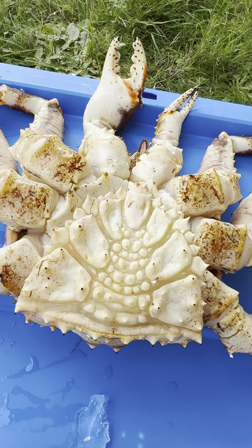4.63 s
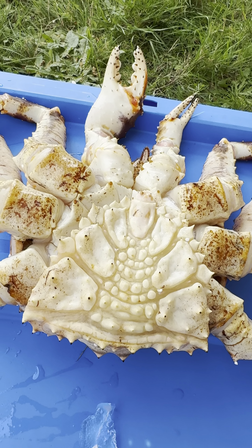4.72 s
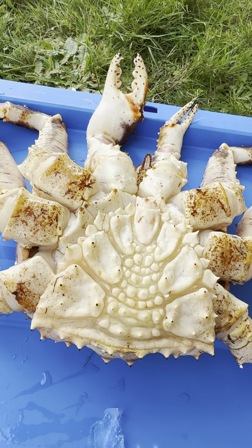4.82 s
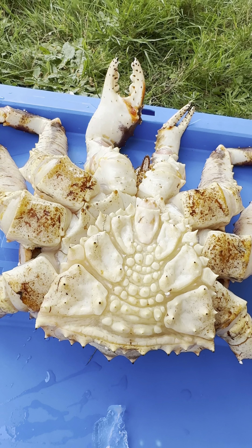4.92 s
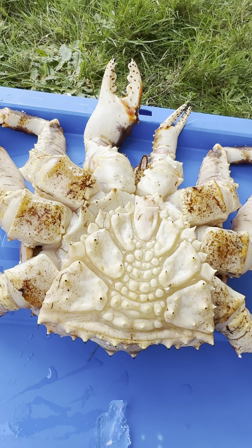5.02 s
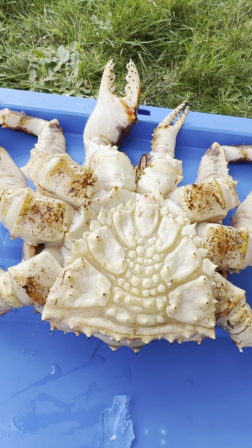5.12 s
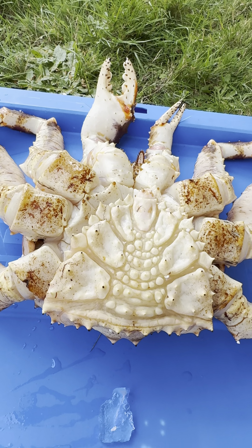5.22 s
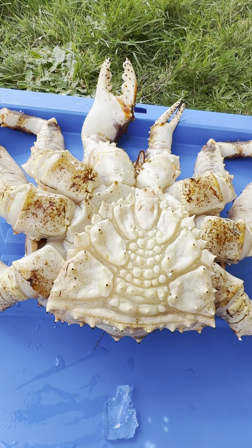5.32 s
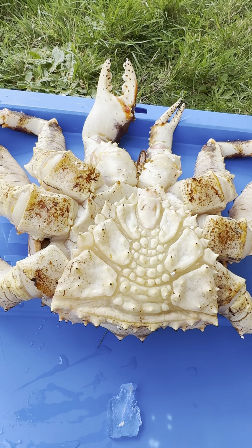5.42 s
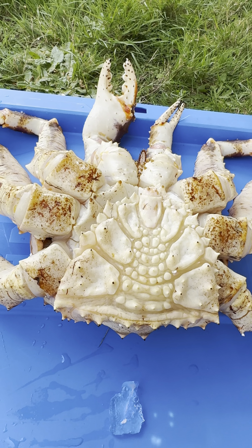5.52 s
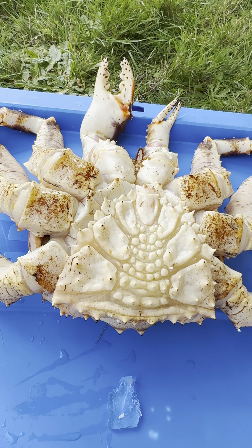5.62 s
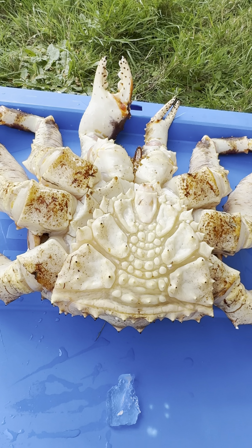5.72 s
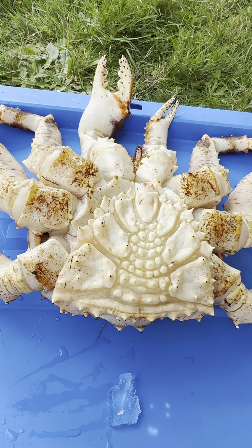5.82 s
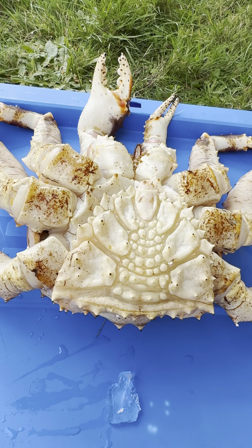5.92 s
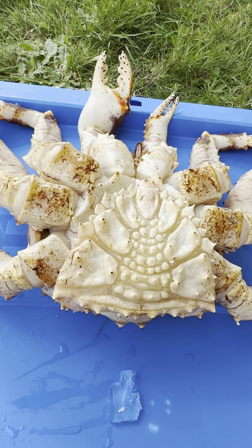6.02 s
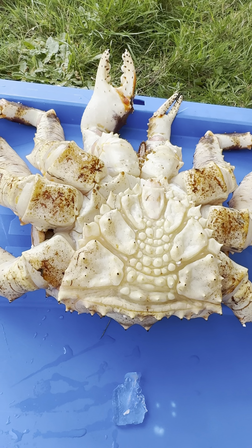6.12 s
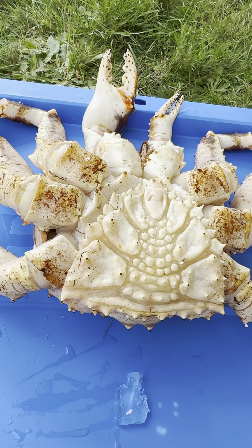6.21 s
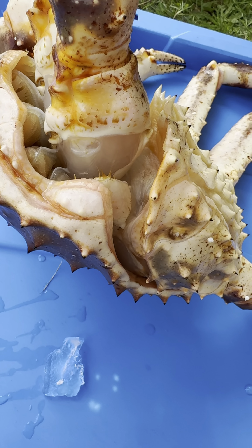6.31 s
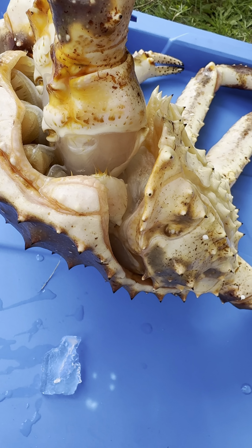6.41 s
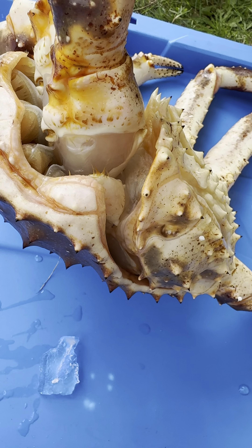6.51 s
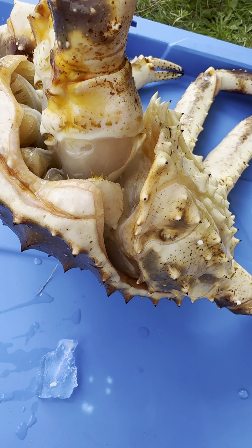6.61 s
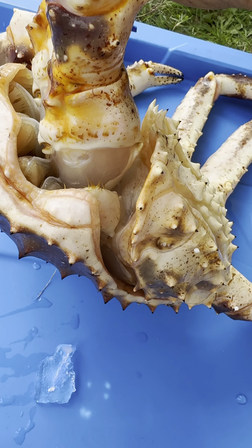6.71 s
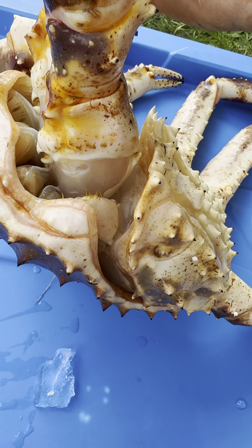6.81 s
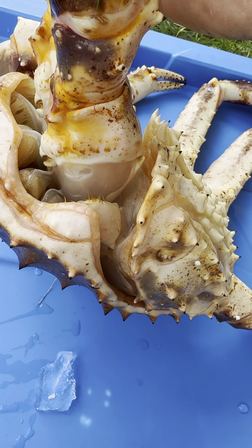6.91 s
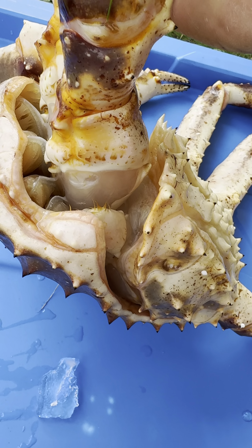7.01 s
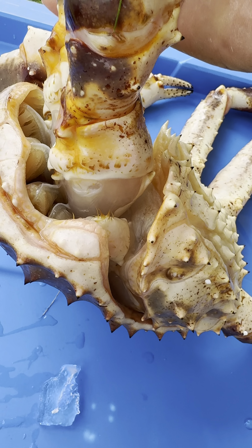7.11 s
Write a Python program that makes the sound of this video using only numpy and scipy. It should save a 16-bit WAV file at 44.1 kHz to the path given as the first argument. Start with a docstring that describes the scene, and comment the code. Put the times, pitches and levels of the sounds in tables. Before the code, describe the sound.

Close stereo sound of a heavy crab shifted in a plastic tub in a yard, over low, slightly wavering motor hum, rumble and faint outdoor hiss. Right at the start a loud, hard, hollow knock lands, followed at 0.3 s by another bright crack; each dies almost instantly, with a short echo from a nearby wall. Hands rustle very softly. From 0.9 to 1.2 s several medium bumps cluster around a brief gritty scrape. At 1.75 to 2 s legs slide and rasp on the side wall with a clear woody tap and weaker ones. Then it is quiet, with tiny ticks and barely audible distant chirps near 2.4 and 3 s. Faint bumps come at 4.1 s, then a tight cluster of moderate knocks at 4.6 to 4.7 s. Small dry clicks occur near 5.4 s. From 6.2 s a deeper hum joins and grows to the end, around 7.2 s, with minute ticks and faint chirps.

```python
"""A large crab is shifted about in a plastic tub: its shell knocks on the floor, its legs on the side wall.
Each blow drives a bank of decaying plastic modes. Filtered noise and trains of tiny blows make the ticks,
drags, slides, judders and the rustle of hands. A nearby wall in the yard answers with an echo and a tail.
Behind it machinery hums on unsteady tones over a rumble, under a faint outdoor hiss with far chirps."""
import sys
import numpy as np
from scipy import signal
from scipy.fft import rfft, irfft, next_fast_len
from scipy.io import wavfile
from scipy.ndimage import uniform_filter1d, minimum_filter1d, map_coordinates

SR = 44100
rng = np.random.default_rng(int(sys.argv[2]) if len(sys.argv) > 2 else 0)


def digitize_waveform(pressure):
    """Quantize a signal to 16-bit integers and store it at the path in sys.argv[1].

    Rows of a 2-D input are taken as channels; values are limited to [-1, 1].
    """
    field = np.atleast_2d(pressure).T
    bounded = np.clip(field, -1, 1)
    quanta = np.round(bounded * 32767).astype(np.int16)
    wavfile.write(sys.argv[1], SR, quanta)


N = 315756  # samples

# Shell on the tub's floor. Each row: start in seconds, blow level in dB, contact cut-off in Hz (higher is
# harder), level of the weight behind it in dB, relative shell crack level in dB, pitch in Hz of the modes
# with a node where it lands, ring time as a multiple of the modes' own.
KNOCKS = [(0.024, -18.5, 690, -16, -83, 444, 1.5), (0.0476, 0.5, 2270, 0.5, -37.5, 1313, 1),
          (0.0625, -36, 2200, -16, -58, 307, 2.5), (0.2989, -3, 3200, -30, -35, 545, 1.1),
          (0.899, -29, 1900, -16, -49, 1250, 3), (0.9120, -18.5, 2100, 5, -37, 732, .8),
          (0.921, -22, 2030, -3.5, -57, 475, .5), (1.0099, -18.5, 1800, -7, -39, 594, 1.2),
          (1.029, -13.5, 2260, -4, -38.5, 860, 1), (1.041, -44, 2600, -6, -54, 550, 1.2),
          (1.1116, -19.5, 2300, -36, -50.5, 900, 1), (1.1533, -25.5, 1440, -14, -63, 950, 1.2),
          (1.176, -35, 780, -12.5, -76, 430, .9), (4.0967, -37, 2010, -9.5, -49, 510, 1.7),
          (4.1185, -28.5, 990, -26, -68, 564, 3), (4.612, -30, 1550, -16, -61, 910, 1.2),
          (4.6517, -32, 1900, -11, -53, 480, 1.2), (4.6575, -16, 2670, -4, -48.5, 1500, .75),
          (4.673, -18.5, 1430, -10, -57.5, 920, .8), (4.6853, -37, 890, -20, -65, 700, 1.8),
          (4.708, -42, 1400, -28, -67, 503, 1.2)]
# Floor modes. Each row: pitch in Hz, level in dB, t60 in seconds, motion towards (+1) or away from (-1)
# the microphone.
FLOOR_MODES = [(83.8, -17, 0.14, 1), (184.6, -26.5, 0.17, -1), (234.3, -12.5, 0.054, 1),
               (290, -7.5, 0.02, -1), (370, -9.5, 0.038, 1), (548, -8.5, 0.024, -1), (650, -4.5, 0.036, 1),
               (709, -29, 0.096, 1), (897, -13, 0.033, 1), (1173, -1.1, 0.011, -1), (1383, -0.9, 0.012, 1),
               (1712, -13, 0.02, 1), (2063, -18, 0.03, -1), (2454, -3, 0.0061, -1), (2730, -9, 0.012, 1)]
# Crack of a hard contact. Each row: frequency in Hz, level in dB.
CRACK_SPECTRUM = [(500, -5.5), (2600, 3.5), (3600, 3), (8000, -7.5), (16000, -40)]
# Phase of the tub's sound at the two microphones. Each row: frequency in Hz, lead of the left in radians.
TUB_TWIST = [(150, 0), (400, -0.77), (800, -0.73), (1350, 0.87), (2700, 1)]
# How the tub radiates. Each row: frequency in Hz, level in dB added on the left and taken from the right.
TUB_LEAN = [(100, 0), (300, .8), (650, -.8), (1000, -3.4), (1350, -3.6), (1800, .4), (2500, 2.6)]
NODE_DEPTH, NODE_OCTAVES = 0.76, 0.3  # share of a mode lost when struck on its node, width in pitch
LEAD_S = .004  # room for the ring's first rise


def knocks():
    """Shell hits the floor: a short crack and a hollow ring, set by where it lands and how it damps."""
    out = np.zeros((2, N))
    t = np.arange(SR // 3) / SR
    crack_t = t[:SR // 20]
    hz = np.transpose(FLOOR_MODES)[0]
    for start_s, blow_db, contact_hz, weight_db, crack_db, node_hz, free in KNOCKS:
        octaves_off = np.log2(hz / node_hz)
        reach = 1 - NODE_DEPTH * np.exp(-(octaves_off / NODE_OCTAVES) ** 2)
        force = reach * contact(hz, blow_db, contact_hz, weight_db)
        ring = plastic_ring(FLOOR_MODES, force, size=len(t), detune=.008, free=free)
        crack_decay = amp(crack_db + 8.5 - 60 * crack_t / 0.018)
        crack = coloured(pair(0.13, size=len(crack_t)), CRACK_SPECTRUM) * crack_decay
        add(out, start_s - LEAD_S, placed(ring, TUB_TWIST, TUB_LEAN))
        add(out, start_s, crack)
    return out


# a blow rebounds too fast to drive the modes below BOUNCE_HZ; weight drives only those below WEIGHT_HZ
BOUNCE_HZ, WEIGHT_HZ = 260, 435


def contact(hz, blow_db, contact_hz, weight_db):
    """Force on each mode: a quick blow, brighter if harder, and the slow push of the crab's weight."""
    rebound = 1 + (BOUNCE_HZ / hz) ** 4
    softness = 1 + (hz / contact_hz) ** 6
    blow = amp(blow_db) / np.sqrt(rebound * softness)
    push = amp(weight_db) / np.sqrt(1 + (hz / WEIGHT_HZ) ** 6)
    return np.hypot(blow, push)


HEAVE_HZ = 150  # below this the floor moves as one piece
BEND_S, BEND_TOP_HZ = .001, 2940  # a quarter of the top frequency arrives about this much later


def plastic_ring(modes, force, size, detune, free=1):
    """One blow on plastic: damped modes; bending waves bring the high ones first, the low ones after."""
    f = np.fft.rfftfreq(size, 1 / SR)
    hz, db, t60_s, facing = np.transpose(modes)[:, :, None]
    # the crab's weight retunes the plastic a little
    pitch_hz = hz * (1 + detune * rng.standard_normal(hz.shape))
    # the shell damps the ripples in the plastic, but not the slow heave of the whole floor
    ring_s = np.where(hz > HEAVE_HZ, t60_s * free, t60_s)
    pole = 2j * np.pi * f + np.log(1000) / ring_s
    shapes = np.sign(facing) * amp(db) * SR * pole / (pole ** 2 + (2 * np.pi * pitch_hz) ** 2)
    delay_s = LEAD_S + BEND_S * (np.sqrt(BEND_TOP_HZ / (f + 50)) - 1)
    delayed = (force @ shapes) * np.exp(-2j * np.pi * f * delay_s)
    # soft plastic carries little above its highest mode
    return irfft(delayed / (1 + (f / 3500) ** 9), size)[None]


# Leg tips on the side wall. Each row: start in seconds, level in dB, contact cut-off in Hz.
TAPS = [(1.8016, -16, 1820), (1.9504, -25.5, 1260), (2.003, -35.5, 900), (4.616, -33, 1870),
        (4.735, -37, 900)]
# Side wall modes. Each row: pitch in Hz, level in dB, t60 in seconds, motion towards (+1) or away (-1).
WALL_MODES = [(330, -8, .02, 1), (715, 1.5, .016, 1), (1345, 4, .015, 1), (1970, 0, .014, 1),
              (2630, -4, .014, 1)]


def taps():
    """Leg tips strike the stiffer side wall with a light, woody tock; a lower cut-off is duller."""
    out = np.zeros((2, N))
    for start_s, db, tip_hz in TAPS:
        force = np.full(len(WALL_MODES), amp(db))
        ring = plastic_ring(WALL_MODES, force, size=SR // 10, detune=.012)
        tock = filtered(ring, lambda hz: 1 / (1 + (hz / tip_hz) ** 4))
        add(out, start_s - LEAD_S, tock)
    return out


# Spines and joints ticking. Each row: start in seconds, relative level in dB, pitch in Hz.
TICKS = [(0.561, -34, 2400), (1.524, -45, 8000), (1.554, -43, 8000), (1.624, -39.5, 7300),
         (2.606, -36.5, 3600), (4.109, -36.5, 7000), (5.371, -34, 6000), (5.383, -33, 8200),
         (5.39, -34.5, 6500), (6.469, -43, 8000), (6.843, -39.5, 9100), (6.901, -40, 8550),
         (7.068, -42.5, 8500)]


def ticks():
    """Spines and leg joints snap: tiny clicks of noise peaked at a pitch, falling 60 dB in 10 ms."""
    out = np.zeros((2, N))
    t = np.arange(SR // 25) / SR
    for start_s, db, hz in TICKS:
        spectrum = [(hz / 4, -22), (hz / 2, -7), (hz, 0), (hz * 2, -6)]  # (Hz, dB)
        snap = coloured(pair(-0.25, size=len(t)), spectrum)
        add(out, start_s - .0005, snap * amp(db - 5.0 - 60 * t / 0.01))
    return out


# Shell dragged over the floor. Each row: start in seconds, length in seconds, level in dB.
DRAGS = [(.13, 0.021, -46.5), (.967, 0.051, -24.5), (1.047, 0.011, -26), (1.706, 0.0082, -46),
         (4.48, 0.024, -50), (4.52, 0.033, -50), (4.611, 0.0071, -46.5), (4.872, 0.072, -57)]
# Colour of the drag's noise. Each row: frequency in Hz, level in dB.
DRAG_SPECTRUM = [(100, -24), (220, -3), (800, 1.5), (1400, -5.5), (2100, -6.5), (2900, -10.5),
                 (3500, -21.5), (7000, -24), (16000, -53)]
SWELL_DB = 8  # a drag grows by this much as the shell bites


def drags():
    """Gritty drags on the floor: catching spines over rough friction noise."""
    rough = friction(DRAG_SPECTRUM, rate_hz=450, rough_db=1.0, alike=0.34)
    grit = amp(CATCH_DB) * catches() + amp(1.5) * rough
    return strokes(DRAGS, attack_s=0.049, release_s=0.022, swell_db=SWELL_DB) * grit


CATCHES_PER_S, CATCH_RANGE_DB, CATCH_DB = 610, 1.5, -2.5  # rate, spread of sizes, level in the grit


def catches():
    """Spines catch and let go at random moments: each tiny blow rings the tub's floor."""
    hit = rng.random(N) < CATCHES_PER_S / SR
    sizes = rng.choice([-1, 1], N) * amp(CATCH_RANGE_DB * rng.standard_normal(N))
    force = contact(np.transpose(FLOOR_MODES)[0], 0, contact_hz=3000, weight_db=-2)
    ring = plastic_ring(FLOOR_MODES, force, size=SR // 5, detune=.008)
    rung = signal.fftconvolve((hit * sizes)[None], ring)[:, :N]
    return unit(placed(rung, TUB_TWIST, TUB_LEAN))


# Legs sliding and settling on the wall. Each row: start in seconds, length in seconds, level in dB.
SLIDES = [(0, 0.011, -34.5), (.062, .008, -32), (1.704, 0.017, -46), (1.75, 0.085, -33.5),
          (1.922, 0.019, -47.5), (4.124, 0.042, -41), (4.62, 0.0092, -38.5), (4.69, 0.013, -44.5)]
# Colour of the slides. Each row: frequency in Hz, level in dB.
SLIDE_SPECTRUM = [(120, -13), (280, 6.5), (400, 5), (500, 6), (620, 10), (760, 9), (1000, -11), (1270, -2),
                  (1470, -10.5), (1620, -9.5), (2000, -13.5), (3500, -21), (16000, -56)]


def slides():
    """Legs slide on the wall: duller friction noise."""
    rough = friction(SLIDE_SPECTRUM, rate_hz=430, rough_db=3.5, alike=0.44)
    return strokes(SLIDES, attack_s=0.12, release_s=0.087) * rough


# Leg tip juddering along the side wall. Each row: start in seconds, length in seconds, level in dB.
JUDDERS = [(1.752, 0.017, -35), (1.812, 0.025, -44), (1.932, .005, -46)]
SLIPS_PER_S, SLIP_SCATTER = 372, .07  # slip rate, log-normal unevenness of the gaps


def judders():
    """A leg tip sticks and slips in a quick, nearly even train that makes the side wall rasp."""
    gaps_s = np.exp(SLIP_SCATTER * rng.standard_normal(N // 50)) / SLIPS_PER_S
    moments = (np.cumsum(gaps_s) * SR).astype(int)
    sizes = amp(1.8 * rng.standard_normal(len(gaps_s)))
    slips = np.bincount(moments, sizes, minlength=N)[:N]
    ring = plastic_ring(WALL_MODES, np.ones(len(WALL_MODES)), size=SR // 10, detune=0, free=1.3)
    spectrum = [(350, -11), (740, 4), (1350, -8.5), (2600, -12.5)]  # (Hz, dB)
    rasp = coloured(signal.fftconvolve(slips[None], ring)[:, :N], spectrum)
    return strokes(JUDDERS, attack_s=0.043, release_s=0.056) * rasp


# Hands shifting their grip. Each row: start in seconds, length in seconds, level in dB.
RUSTLES = [(.05, 0.054, -70), (.57, 0.62, -58.5), (1.58, 0.23, -61.5), (3.33, 0.1, -67), (3.7, 0.3, -70),
           (6.8, 0.18, -72)]
# Colour of the rustle. Each row: frequency in Hz, level in dB.
RUSTLE_SPECTRUM = [(1000, -10.5), (2500, -0.5), (4500, -4), (7000, -2), (10000, -9), (16000, -19.5)]
HOLDING_DB = -72.5  # hands holding still


def rustles():
    """Hands rustle softly: a constant faint friction that rises as the grip shifts."""
    grip = amp(HOLDING_DB) + strokes(RUSTLES, attack_s=0.53, release_s=0.58)
    return grip * friction(RUSTLE_SPECTRUM, rate_hz=60, rough_db=2, alike=-0.4)


def friction(spectrum, rate_hz, rough_db, alike):
    """A rough surface catches and slips: coloured noise whose level wanders at a given rate."""
    return coloured(pair(alike, size=N) * amp(rough_db * wobble(rate_hz)), spectrum)


def strokes(rows, attack_s, release_s, swell_db=0):
    """Gain per sample: strokes rise, hold or swell, and die away; attack and release span 60 dB."""
    t = np.arange(N) / SR
    start_s, length_s, db = np.transpose(rows)[:, :, None]
    before = np.maximum(start_s - t, 0) / attack_s
    after = np.maximum(t - start_s - length_s, 0) / release_s
    to_go = np.clip(1 - (t - start_s) / length_s, 0, 1)
    return amp(db - swell_db * to_go - 60 * (before + after)).sum(axis=0)


# Decay of the yard. Each row: frequency in Hz, t60 in seconds.
YARD_T60 = [(100, 0.46), (600, 0.2), (2000, 0.14), (5000, 0.15), (12000, 0.058)]


def yard(x, wall_s, wall_db, tail_db, low_hz):
    """A wall throws back a smeared echo, over a diffuse tail."""
    hz, t, z = signal.stft(rng.standard_normal((2, SR // 3)), SR, nperseg=256)
    decay = amp(-60 * t / along(YARD_T60, hz)[:, None])
    tail = signal.istft(z * decay, SR, nperseg=256)[1]
    t = np.arange(tail.shape[1]) / SR
    tail = tail * (1 - np.exp(-(t / 0.0034) ** 2))
    echo = rng.standard_normal(tail.shape) * np.exp(-((t - wall_s) / .002) ** 2)
    answer = amp(tail_db) * tail / np.linalg.norm(tail[0])
    answer = answer + amp(wall_db) * echo / np.linalg.norm(echo[0])
    # long waves are the same at both microphones
    answer = answer + filtered(answer[:1] - answer, lambda f: 1 / (1 + (f / 450) ** 4))
    returned = signal.fftconvolve(x, answer, axes=1)[:, :N]
    # the open yard returns little bass
    return filtered(returned, lambda f: f / np.hypot(f, low_hz))


# Motor and mains tones. Each row: pitch in Hz, rms level in dB before the lean.
HUM = [(87, -54), (119.9, -45), (147.2, -51.5), (219, -60), (239.8, -54), (359.7, -66)]
# A deeper tone joins the hum. Each row: time in seconds, rms level in dB before the lean.
LATE_HUM = [(6.2, -50), (6.35, -48), (7.16, -45.5)]
# Colour of the rumble. Each row: frequency in Hz, level in dB.
RUMBLE_SPECTRUM = [(10, -11.5), (22, -38), (45, -2.5), (65, 4), (95, 6.5), (130, 3), (175, -2.5),
                   (250, 0.5), (300, -7.5), (380, -12.5), (480, -25.5), (800, -15), (2000, -135)]


def machinery():
    """Slightly unsteady motor and mains tones over a low rumble, a little to the left."""
    def tone(hz):
        phase = 2 * np.pi * hz * np.arange(N) / SR + 0.82 * wobble(2.505)
        return np.sqrt(2) * np.sin(phase)

    hum = sum(amp(db + 1.2 * wobble(3.09)) * tone(hz) for hz, db in HUM)
    hum = hum + level(LATE_HUM) * tone(hz=74.8)
    rumble = amp(-43.5) * coloured(pair(0.97, size=N), RUMBLE_SPECTRUM)
    # (Hz, dB added on the left and taken from the right)
    lean = [(60, 0.34), (120, 1.22), (220, 1.37), (380, 7.5), (700, 1.1)]
    return filtered(hum + rumble, lambda hz: amp(np.outer([1, -1], along(lean, hz))))


# Colour of the hiss. Each row: frequency in Hz, level in dB.
AIR_SPECTRUM = [(150, -11.5), (400, -2.5), (500, -7), (575, 9), (620, -4.5), (730, 1), (1100, -3),
                (1600, -10.5), (2400, -15.5), (4200, -20.5), (6000, -24.5), (8000, -33), (11000, -49.5),
                (16000, -43.5)]
# The hiss comes from one side. Each row: frequency in Hz, lead of the left in radians.
AIR_TWIST = [(100, -1.5), (430, -1.55), (950, -2.5), (2400, -1.5)]


def air():
    """Wide outdoor hiss: coloured noise that swells gently in patches."""
    hiss = patchy(pair(0.51, size=N), depth_db=1.5, span_hz=600, span_s=.16)
    swell = amp(-52 + 0.33 * wobble(2.9))
    return swell * placed(coloured(hiss, AIR_SPECTRUM), AIR_TWIST) * amp([[.6], [-.6]])


# Faint distant chirps. Each row: centre in seconds, length in seconds, pitch in Hz, level in dB.
CHIRPS = [(2.382, 0.02, 4460, -63), (3, 0.029, 4570, -65), (6.983, 0.038, 3240, -61.5),
          (7.12, 0.077, 6240, -66.5)]


def chirps():
    """Far chirps: narrow bands of noise under a bell-shaped envelope."""
    out = np.zeros((2, N))
    t = np.arange(SR // 4) / SR - 1 / 8
    for centre_s, length_s, hz, db in CHIRPS:
        note = unit(filtered(pair(0, size=len(t)), lambda f: np.exp(-((f - hz) / 320) ** 2)))
        add(out, centre_s + t[0], amp(db) * note * np.exp(-(2 * t / length_s) ** 2))
    return out


def patchy(x, depth_db, span_hz, span_s):
    """x with drifting patches of random gain across pitch and time."""
    hz, t, z = signal.stft(x, SR, nperseg=512)
    field = uniform_filter1d(rng.standard_normal(z.shape[1:]), int(span_hz / hz[1]) + 1, 0)
    field = unit(uniform_filter1d(field, int(span_s / t[1]) + 1, 1))
    return signal.istft(z * amp(depth_db * field), nperseg=512)[1][:, :N]


def amp(db):
    """Gain from dB."""
    return 10 ** (np.asarray(db) / 20)


def unit(x):
    """x at rms 1."""
    return x / np.sqrt(np.mean(x ** 2) + 1e-20)


def along(points, hz):
    """(Hz, value) points interpolated on a log axis."""
    f, v = np.transpose(points)
    return np.interp(np.log(hz + 1), np.log(f + 1), v)


def level(rows):
    """Gain per sample from (s, dB) rows, silent outside them."""
    s, db = np.transpose(rows)
    return amp(np.interp(np.arange(N) / SR, s, db, left=-140, right=-140))


def wobble(rate_hz):
    """A smooth random curve, rate_hz knots a second."""
    knots = rng.standard_normal(int(N * rate_hz / SR) + 4)
    return map_coordinates(knots, [np.arange(N) * rate_hz / SR])


def filtered(x, response):
    """x times a response of frequency."""
    n = x.shape[-1]
    m = next_fast_len(n + SR // 8)
    return irfft(rfft(x, m) * response(np.fft.rfftfreq(m, 1 / SR)), m)[..., :n]


def coloured(x, spectrum):
    """x given a spectrum, at rms 1."""
    return unit(filtered(x, lambda hz: amp(along(spectrum, hz))))


def pair(alike, size):
    """Two white noises with a given correlation."""
    a, b = rng.standard_normal((2, size))
    turn = np.arccos(np.clip(alike, -1, 1)) / 2
    return np.cos(turn) * a + np.sin(turn) * np.array([b, -b])


def placed(x, twist, lean=((100, 0), (1000, 0))):
    """Give a sound its phase and level difference between the two microphones."""
    sides = np.array([[1], [-1]])
    return filtered(x, lambda hz: amp(sides * along(lean, hz)) * np.exp(.5j * sides * along(twist, hz)))


def add(track, s, sound):
    """Mix a stereo sound in at time s."""
    part = track[:, max(round(s * SR), 0):][:, :sound.shape[1]]
    part += sound[:, :part.shape[1]]


def scene():
    """The crab in its tub, the yard's answer, the machinery and the outdoor air."""
    scrapes = drags() + slides() + rustles()
    crab = knocks() + taps() + ticks() + scrapes + judders()
    answer = yard(crab, wall_s=0.0201, wall_db=-17.5, tail_db=-14.0, low_hz=420)
    return crab + answer + machinery() + air() + chirps()


CEILING = .92  # of full scale


def limited(x):
    """A limiter ducks for a few milliseconds around peaks above the ceiling."""
    needed = np.minimum(1, CEILING / (np.abs(x).max(axis=0) + 1e-9))
    held = minimum_filter1d(needed, size=SR // 250)
    return x * uniform_filter1d(held, size=SR // 250)


# What the microphone pair keeps of sound common to both sides. Each row: frequency in Hz, gain in dB.
CENTRE = [(4000, 0), (9000, 0), (11500, -9), (15000, -4)]
TOP_HZ = 16100  # band limit


def record(dry):
    """The microphone pair widens the top treble; peaks are limited, then the band limit cuts steeply."""
    mid, side = (dry[0] + dry[1]) / 2, (dry[0] - dry[1]) / 2
    mid = filtered(mid, lambda hz: amp(along(CENTRE, hz)))
    stereo = limited(np.array([mid + side, mid - side]))
    return filtered(stereo, lambda hz: 1 / np.sqrt(1 + (hz / TOP_HZ) ** 120))


dry = scene()
out = record(dry)
digitize_waveform(out)
```